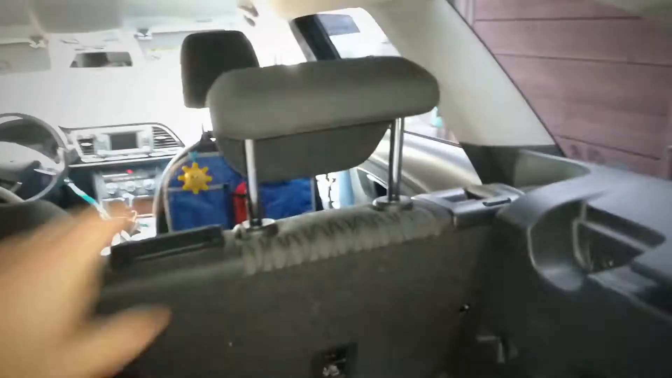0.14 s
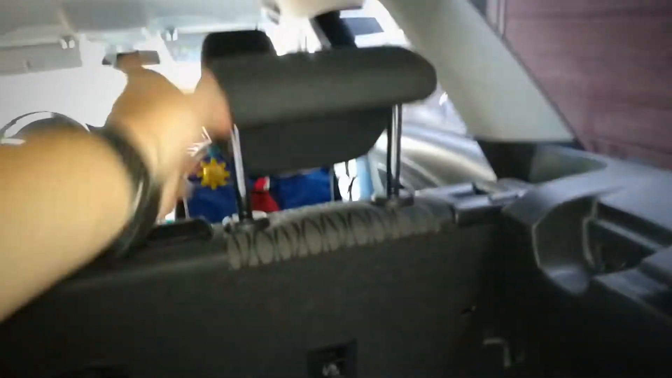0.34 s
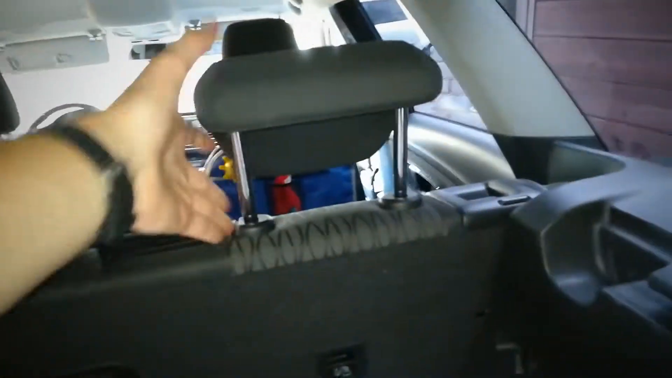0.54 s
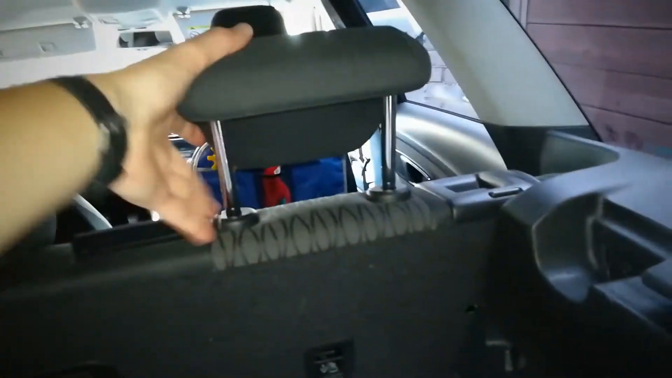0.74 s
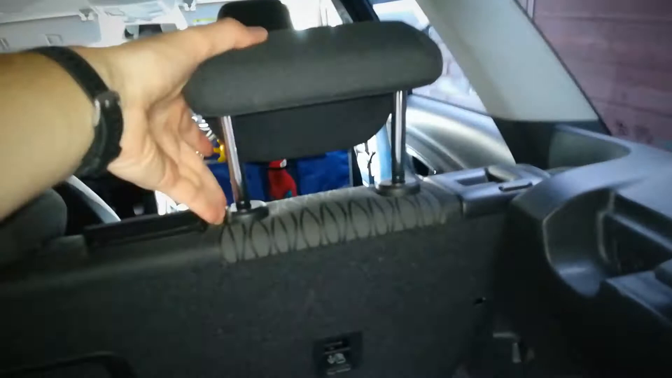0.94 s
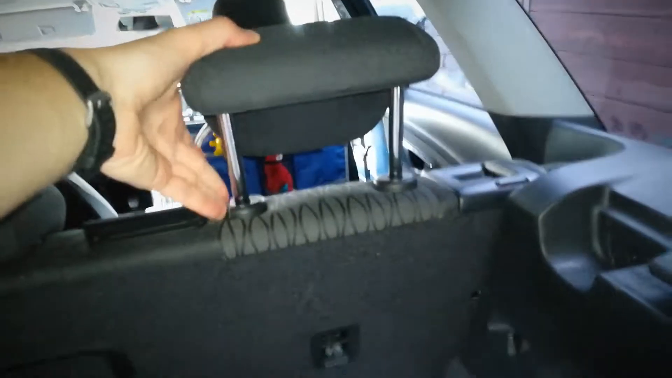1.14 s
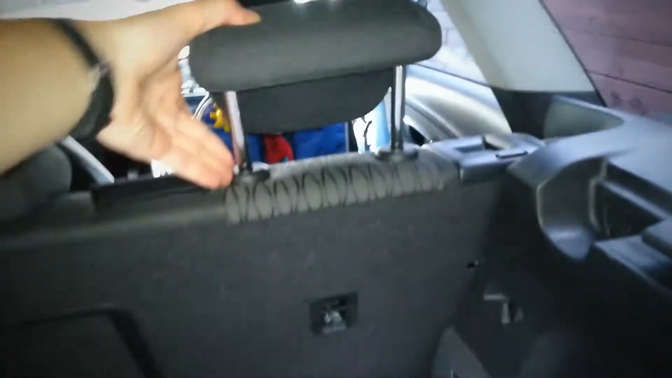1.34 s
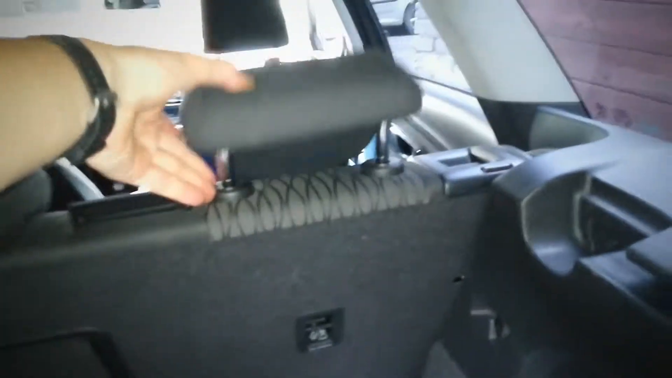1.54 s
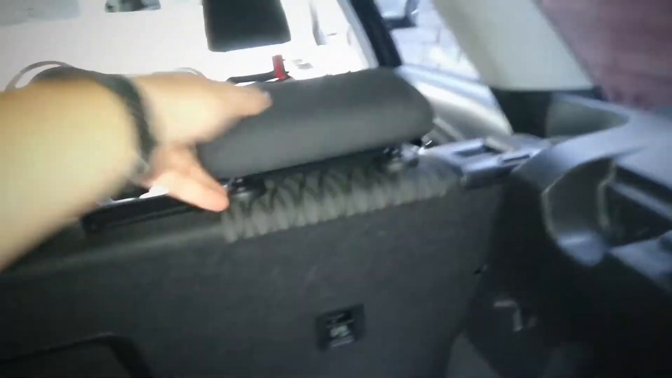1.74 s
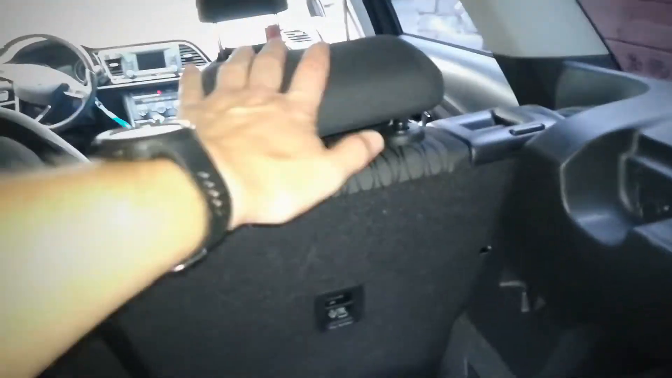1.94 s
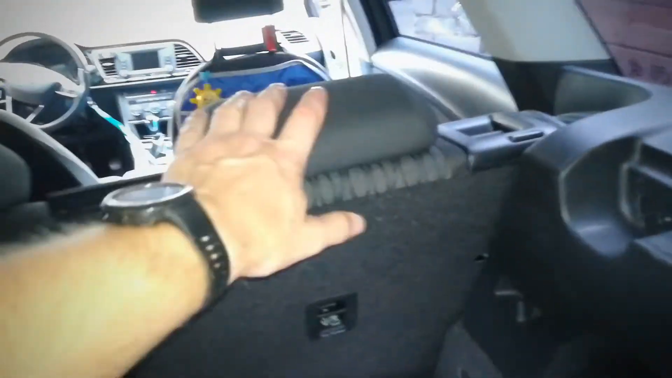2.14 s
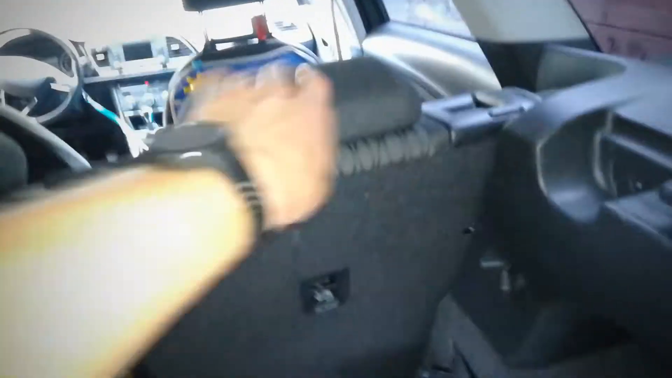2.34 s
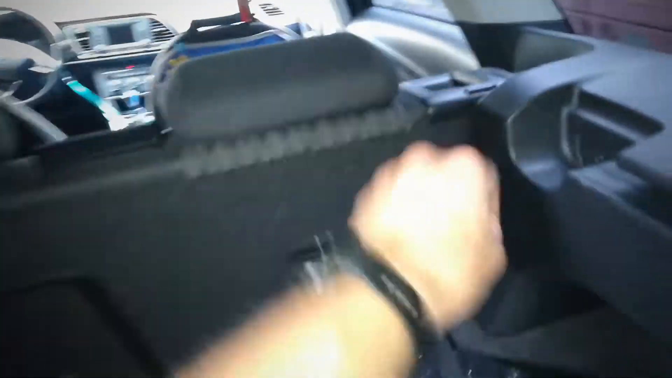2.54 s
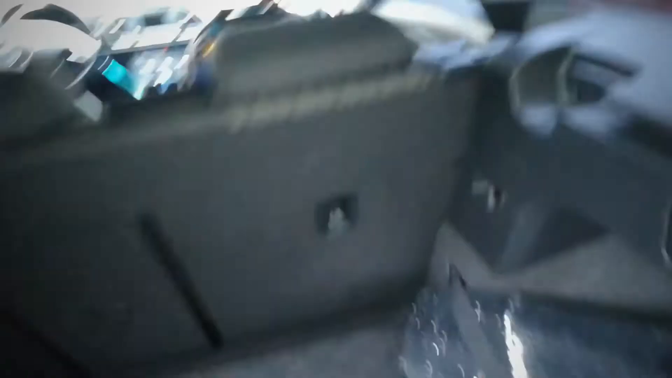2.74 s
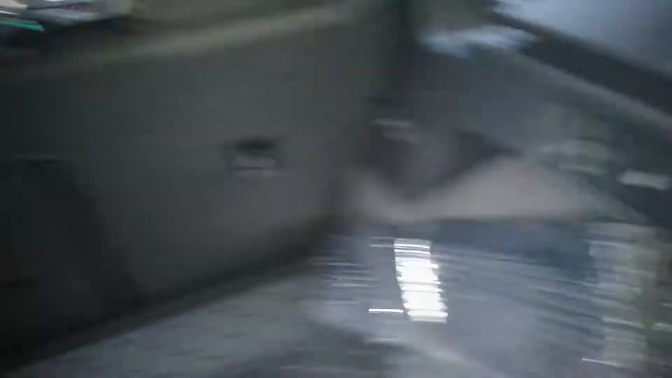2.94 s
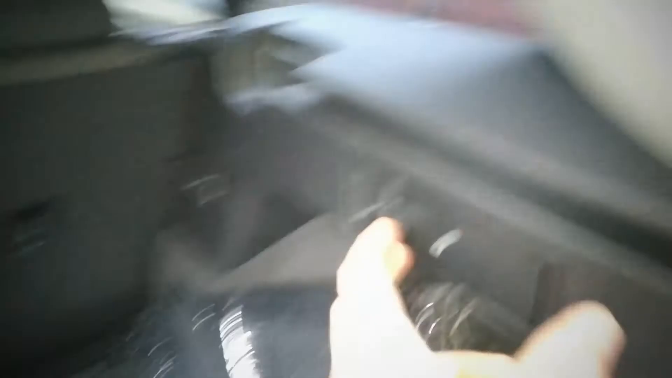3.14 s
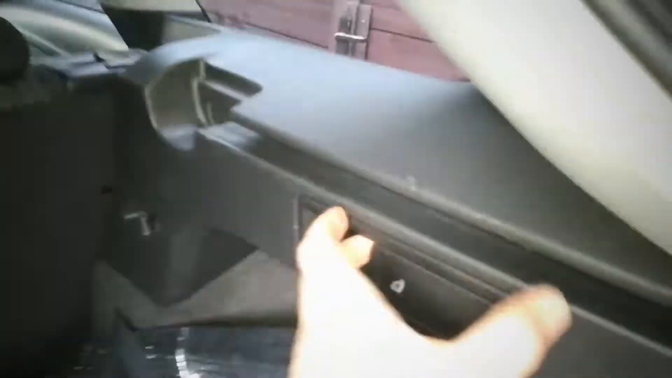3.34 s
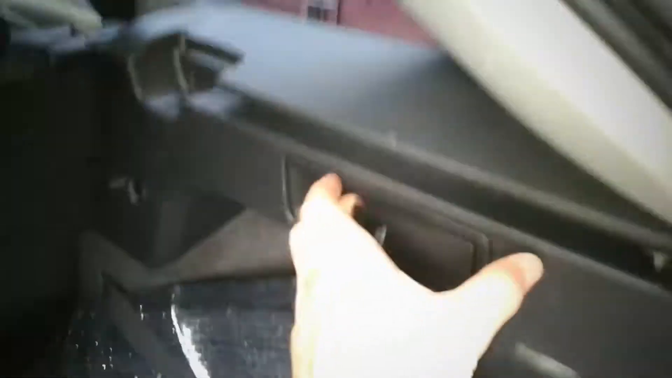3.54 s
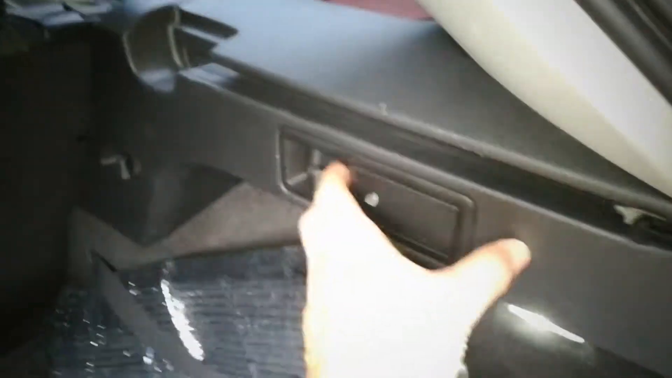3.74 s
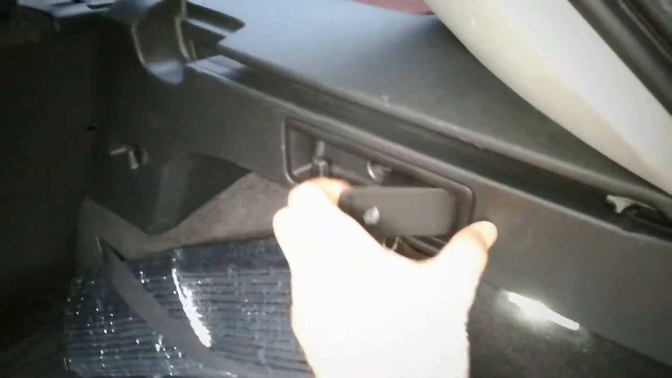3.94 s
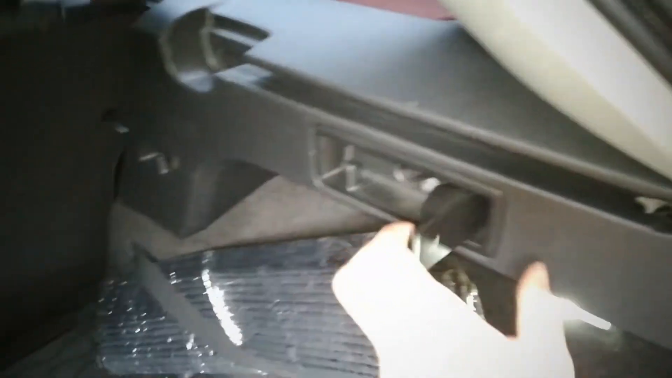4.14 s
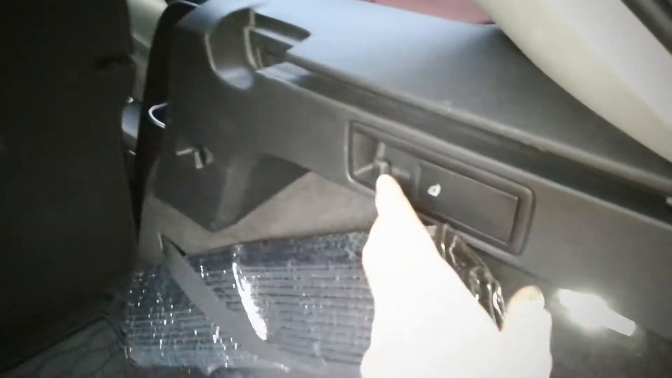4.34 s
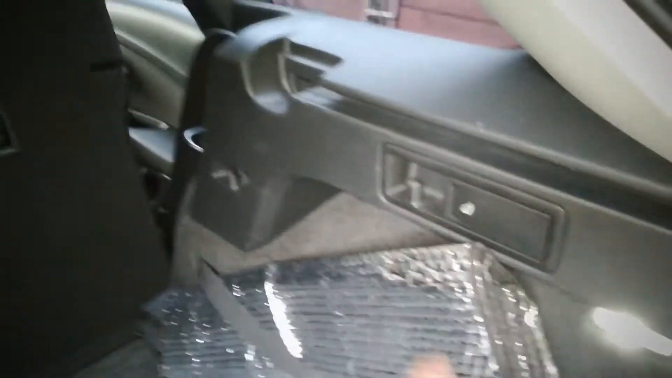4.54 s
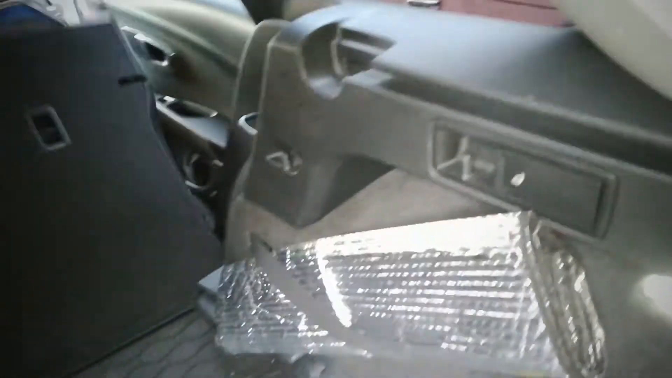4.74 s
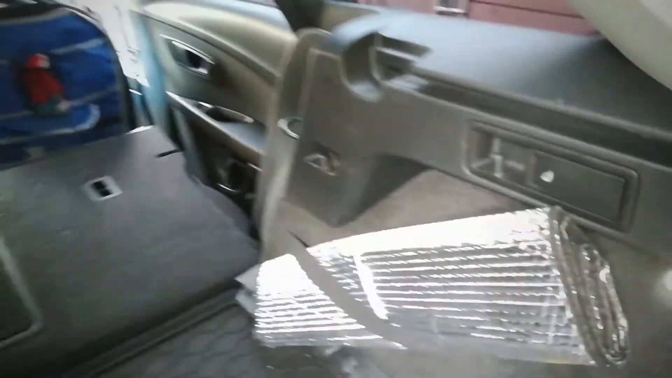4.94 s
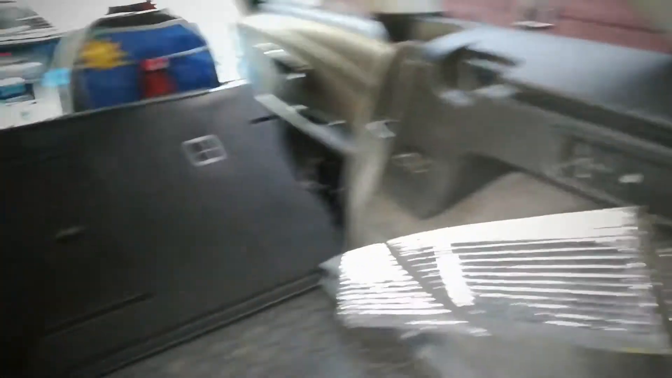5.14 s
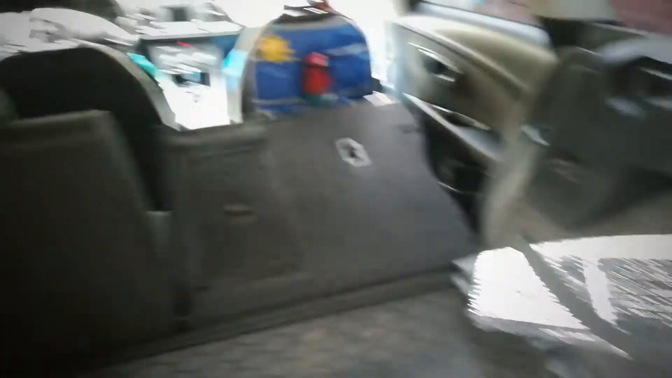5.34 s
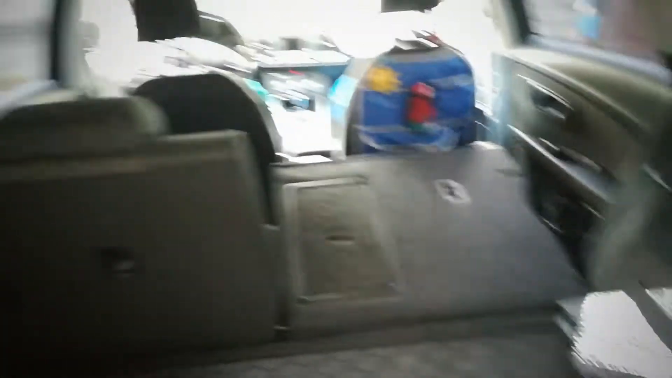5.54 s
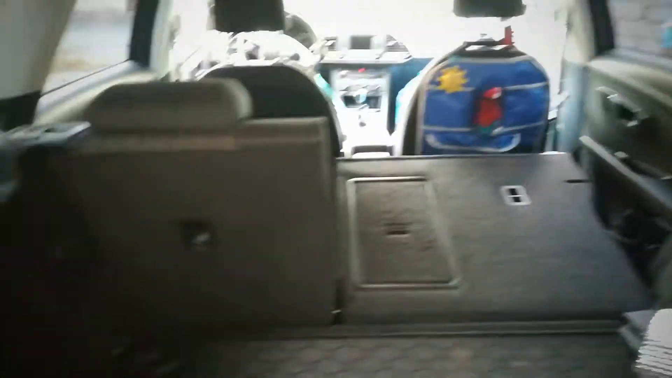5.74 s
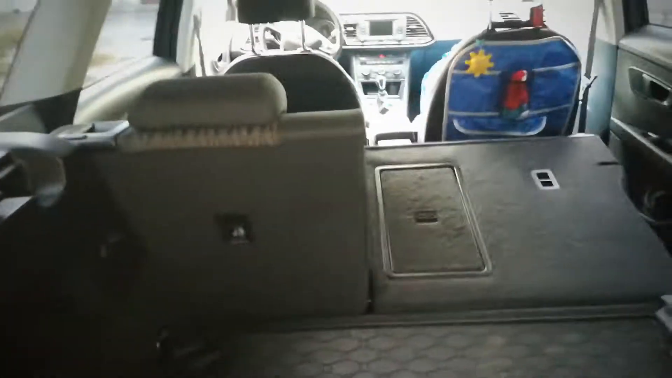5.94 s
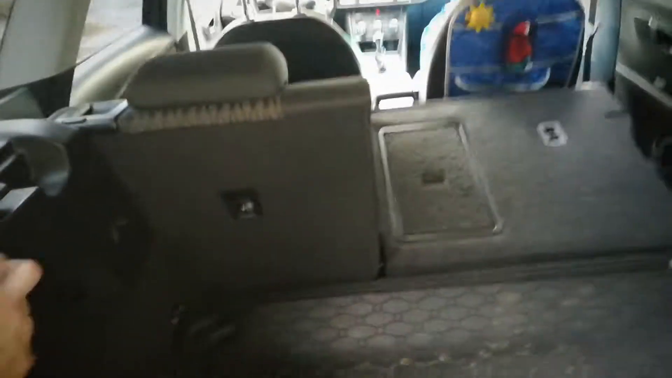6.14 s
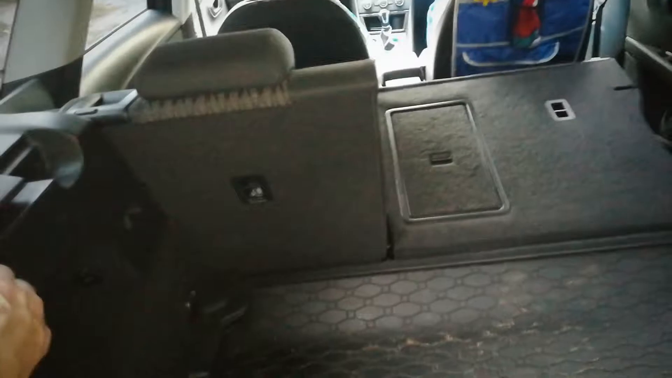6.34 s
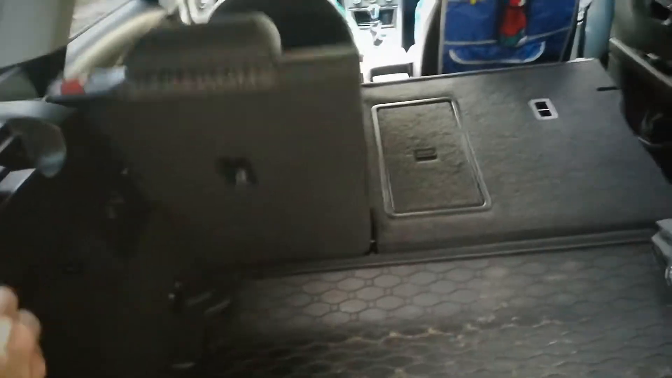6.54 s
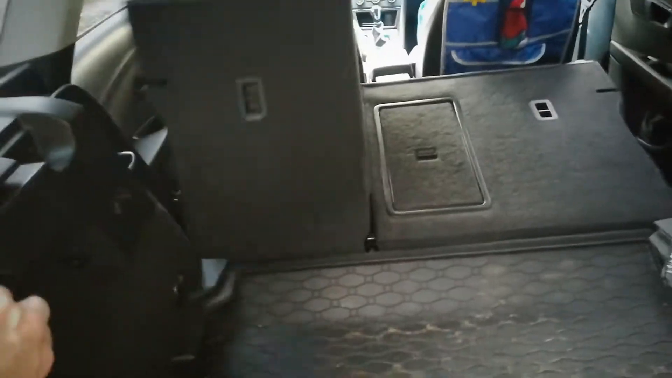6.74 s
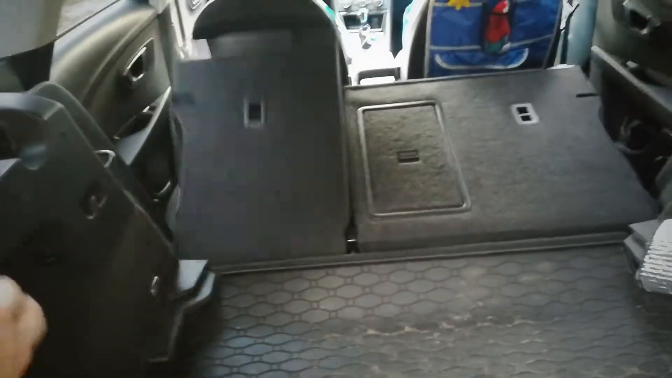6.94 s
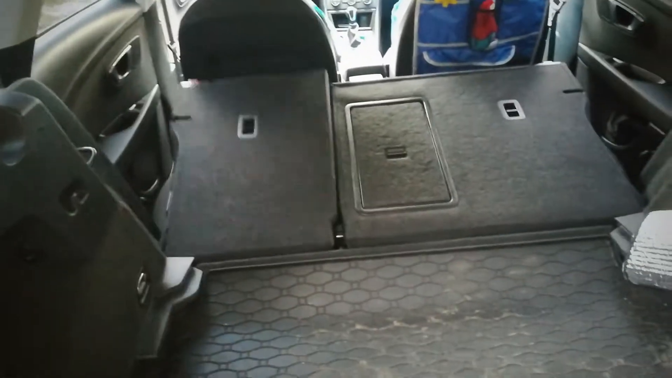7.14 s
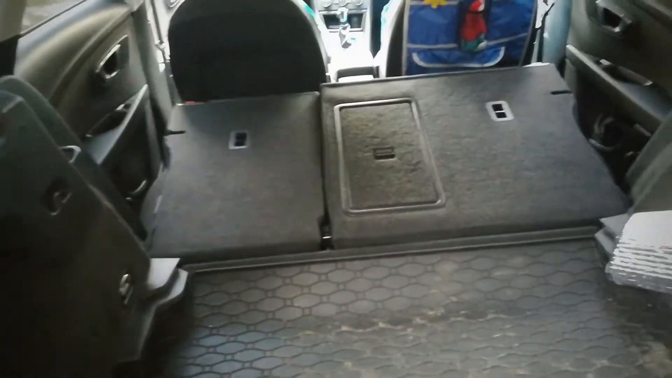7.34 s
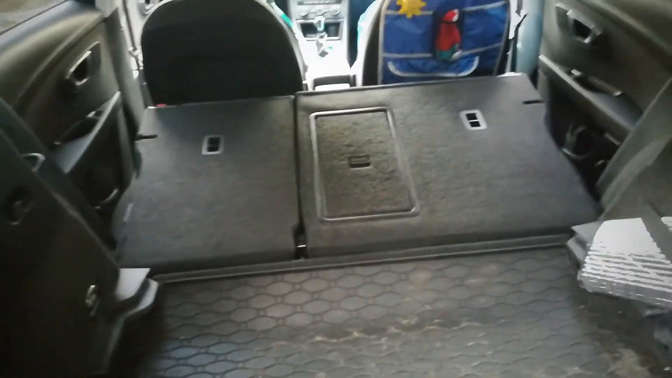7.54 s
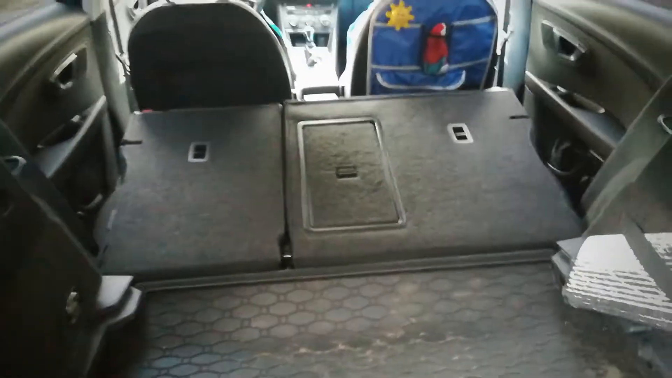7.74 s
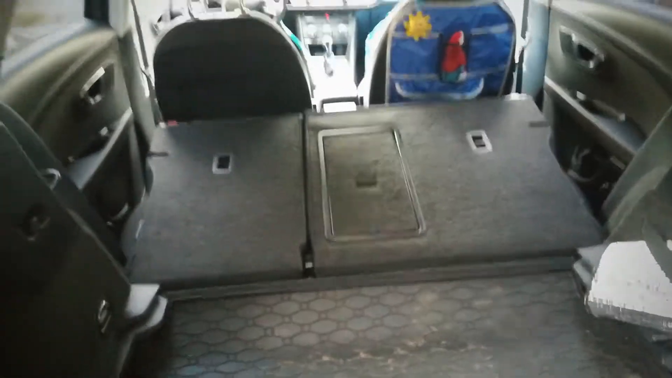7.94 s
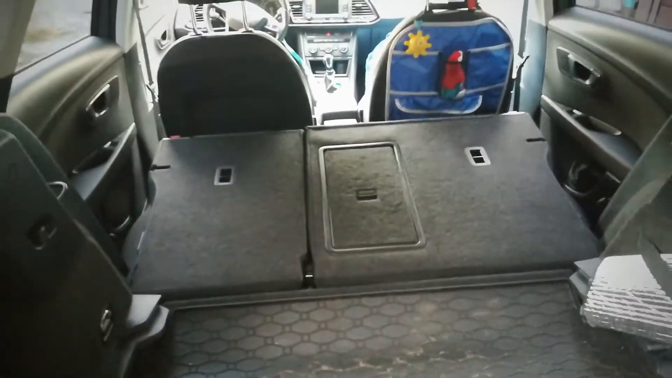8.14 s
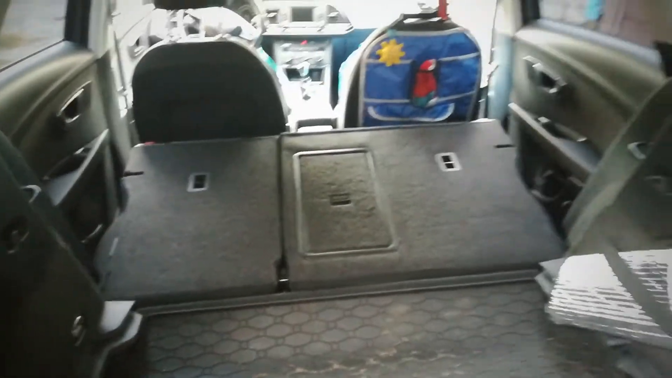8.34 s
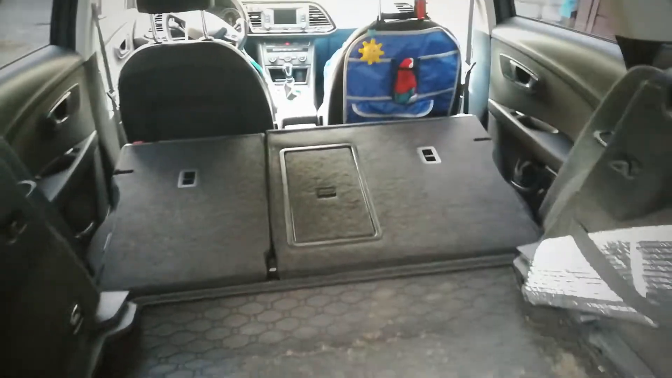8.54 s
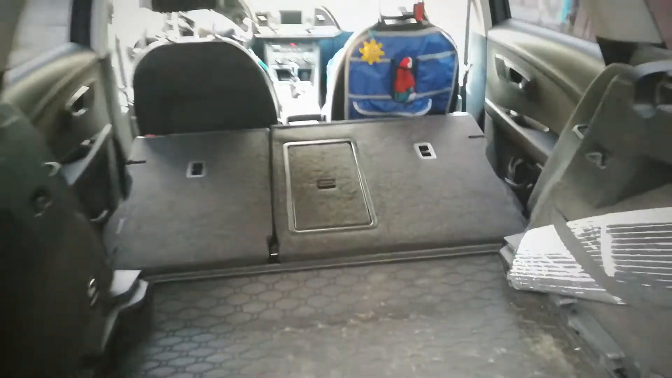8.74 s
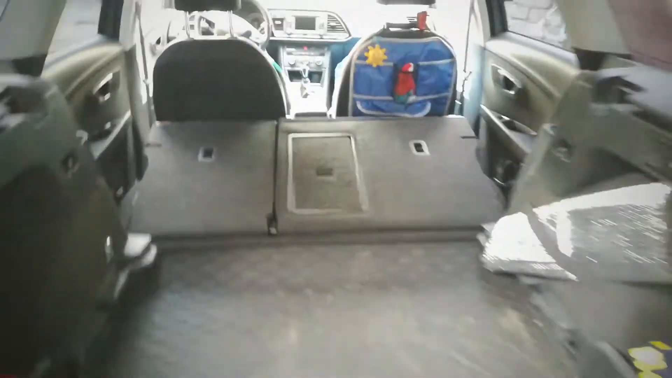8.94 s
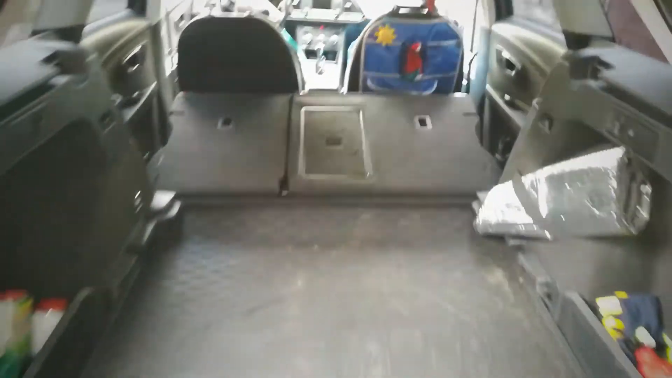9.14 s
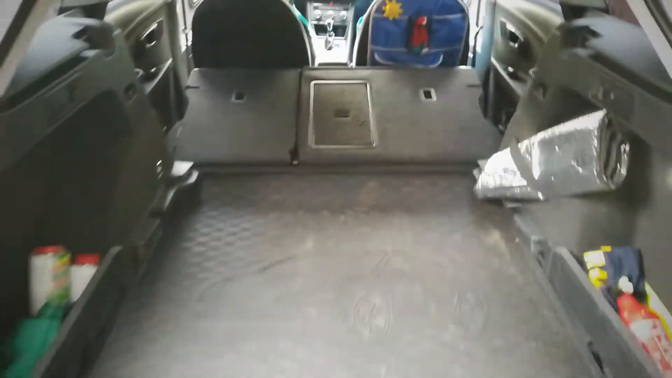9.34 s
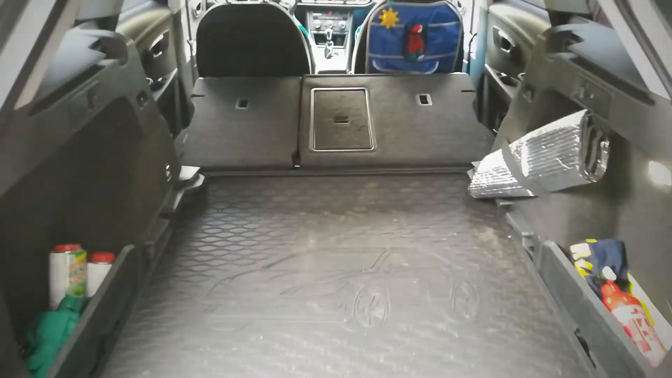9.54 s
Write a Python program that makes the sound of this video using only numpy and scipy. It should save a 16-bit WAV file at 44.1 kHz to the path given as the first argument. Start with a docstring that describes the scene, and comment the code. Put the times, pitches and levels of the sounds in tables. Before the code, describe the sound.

A headrest slides down with soft thuds, then a lever clacks sharply and two car seatbacks drop with deep, padded booms.

```python
"""Folding rear seats in a parked hatchback

Heard at a hand-held phone in the boot: a headrest is pushed down, then two levers release the rear seatbacks.
Catches: noise bursts ringing the trim. Belts, upholstery: grainy friction noise. Seatbacks drop and bounce:
pressure pulses booming in the cabin modes, with rumble of the swaying shell. Fingers tap and brush the phone.
Behind it, quiet outdoor noise and two engine hums."""
import sys
import numpy as np
from scipy import signal
from scipy.fft import rfft, irfft, next_fast_len
from scipy.io import wavfile

SR = 44100
rng = np.random.default_rng(int(sys.argv[2]) if len(sys.argv) > 2 else 0)


def waveform_to_disk(signal):
    """Save audio, clipped to [-1, 1], as 16-bit WAV at the path in sys.argv[1]."""
    frames = np.transpose(np.atleast_2d(signal))
    scaled = np.clip(frames, -1, 1) * 32767
    samples = np.round(scaled).astype(np.int16)
    wavfile.write(sys.argv[1], SR, samples)


N = 422478
TIME_S = np.arange(N) / SR
STEPS_S = np.arange(0, N / SR, .002)  # grid of the slow controls

# bands used throughout: low/Hz, high/Hz; order: main, body, bright, air
BAND_EDGES_HZ = [(600, 2500), (150, 600), (2500, 6000), (6000, 15000)]
# outdoor noise spectrum, relative: f/Hz, density/dB per Hz
OUTDOOR_COLOUR = [(13, -31), (22, 5.5), (54, -5), (157, -9), (218, -18), (279, -20), (582, -30.5),
                  (1060, -26.5), (1600, -26), (2540, -31.5), (3250, -29), (8010, -36), (15000, -40)]
# distant engines: mean f/Hz, loudest t/s, level/dB, half width/s
ENGINES = [(58.3, 0.33, -65.5, .3), (152, 3.17, -60, .24)]
# fingers on the phone's case: t/s, peak/dB, half contact/ms, left minus right/dB
TAPS = [(3.0015, -28.5, 0.23, 11.5), (3.1252, -40.5, 0.27, 16), (8.1915, -32, 1.3, 3.5),
        (8.1908, -33, 0.052, 20.5), (8.2424, -25.5, 0.19, 19), (8.4345, -34, .032, 2)]
# long slides of headrest, hand, belts, upholstery:
# start/s, end/s, starting level/dB, change/dB per s, body/dB, treble/dB (both re main band)
SLIDES = [(0.303, 0.508, -67, 1, -3.5, -5), (0.69, 0.91, -75, -1, 2, -3), (1.55, 1.853, -82, 22, -6, -6),
          (1.948, 2.38, -77.5, -2, 2.5, -2), (2.88, 3.223, -74.5, -4, -1.5, -5.5),
          (3.284, 3.517, -62, -23, 4, -8.5), (3.68, 3.88, -80, 33, 2.5, 0),
          (3.87, 4.12, -61.5, 12, -2, -8.5), (4.13, 4.35, -48.5, -3, -5, -3.5),
          (4.42, 4.937, -55, -32, 1.5, -7.5), (5.105, 5.734, -72.5, 1.5, 2, -6.5),
          (5.73, 5.906, -65.5, -10, -7, -6.5), (5.93, 6.348, -76, 1.5, 2.5, -2.5),
          (6.353, 6.6, -62, -10, 2.5, -10.5), (6.627, 6.865, -56.5, -22, 0.5, -9),
          (6.979, 7.101, -51.5, -45, 7, -12), (7.37, 7.623, -73, -16, 4.5, -5),
          (8.762, 9.552, -80, -0.5, 3.5, -4.5)]
# short rubs and creaks of cloth, skin, hinges: start/s, end/s, level before swell/dB,
# body/dB, bright/dB, air/dB (all three re level), left minus right/dB, resonance f/Hz
RUBS = [(0.346, 0.425, -65.5, -5, 1, -15, -1, 1720), (0.428, 0.475, -63.5, 8, 3, 0, -2, 4170),
        (2.062, 2.165, -58, 2.5, -9, -12.5, -2.5, 960), (2.394, 2.483, -70.5, -25, 11, 11, -2.5, 4230),
        (2.403, 2.438, -61, -20, -20, -24, -7, 1480), (3.124, 3.205, -64, -3, -20, -25, 12, 1070),
        (3.256, 3.265, -56, -8, -14, -17, -6, 1800), (3.319, 3.349, -55, -6, -6.5, -20, -3, 4370),
        (3.365, 3.405, -59, -15, -30, -20, -4, 1740), (5.326, 5.395, -55.5, -25, -15.5, -23, -1.5, 1470),
        (6.113, 6.18, -60.5, -17, -8, -16, 3, 1900), (6.111, 6.164, -73, -8, 13.5, -8, 2, 3600),
        (6.867, 6.968, -48.5, -6, -26, -17.5, -2.5, 1180), (6.872, 6.958, -64.5, -13, 13.5, -18, 3, 3700),
        (6.982, 7.098, -55, -2.5, -0.5, 2, -5, 1620), (7.145, 7.241, -60, -4, -7, -7, -4.5, 1170),
        (7.262, 7.376, -63, -1.5, -7.5, -7.5, -2, 1177), (8.181, 8.212, -57, 5, -5.5, -12, 12, 6070),
        (8.244, 8.268, -51.5, -6, 0.5, -7.5, 15, 1640), (8.777, 8.834, -67.5, -20.5, -1.5, -19, 3, 2060),
        (8.844, 8.939, -71.5, -20, -1.5, -19.5, -1, 1570), (8.95, 8.98, -64, -18, -8.5, -26, -1, 2170),
        (9.049, 9.09, -67.5, -11.5, -8, -20, -1.5, 865)]
# catches, levers, trim: t/s, main-band level/dB, body/dB, bright/dB, air/dB (all three re level),
# ring t60/s, left minus right/dB, the part's own note f/Hz
KNOCKS = [(0.326, -61.5, -23, 7, -4.5, 0.048, -2, 1780), (0.439, -63.5, 5, 5, -3, 0.044, -5, 4280),
          (0.467, -54.5, 2.5, -1.5, -5.5, 0.046, -3, 4150),
          (0.8299, -48.5, 6, -4.5, -15.5, 0.044, -2.5, 1180),
          (1.2396, -46.5, -1.5, -28, -15, 0.037, -3.5, 1550),
          (1.252, -49.5, -25, 0.5, 0.5, 0.01, -1.5, 1150),
          (1.3449, -62.5, -2.5, -6.5, 0.5, 0.021, -1.5, 870),
          (1.861, -64, 1.5, -2.5, 0.5, 0.087, -0.5, 1550), (1.951, -47.5, -7.5, -50, -36, 0.014, -4, 850),
          (2.1944, -66.5, -13, -1, -13, 0.039, -1, 1330), (2.23, -60, -8, -0.5, -17, 0.024, -2, 1160),
          (2.313, -79.5, -1, 11.5, 3, 0.17, -1, 4540), (3.2801, -47, -7, -4.5, -16.5, 0.035, -3, 1930),
          (3.4923, -52, -2.5, -18.5, -23, 0.07, -4.5, 1820), (3.613, -43, -0.5, -9.5, -14, 0.037, -4, 1610),
          (3.895, -56, -22, -14, -13, 0.036, 1, 1500), (3.928, -50.5, -21, -13, -27, .038, 2.5, 2130),
          (4.032, -42.5, -13, -2.5, -14.5, 0.071, -9.5, 1880), (4.046, -52.5, -17, 6, -3, 0.061, 3, 2880),
          (4.0828, -32, -6, -28, -26, .07, -1, 1070), (4.096, -46.5, -12, -4, -6.5, .07, -1.5, 950),
          (4.3348, -48.5, -9.5, -6, 3, 0.02, -7, 4920), (4.353, -52, -8, 5, 13, 0.045, 9, 1360),
          (4.3564, -26.5, -4, -3, -5.5, 0.038, -2.5, 1490),
          (4.3858, -38, 4.5, -3, -12.5, 0.058, -2.5, 1015), (4.946, -55, 11, -11.5, -12, 0.45, -2, 646),
          (4.9662, -58.5, 5.5, 4.5, -3, .038, 1, 650), (5.004, -59.5, 7.5, 0, 4, 0.089, -3, 648),
          (5.129, -47.5, -14.5, -2.5, -10.5, 0.071, 0, 1630), (6.222, -56.5, -7, -7, -29, 0.08, -1, 1910),
          (6.333, -74, -2, 3, 2, 0.11, 0, 5170), (6.356, -52.5, -4.5, -8, -12, 0.091, -2, 1904),
          (6.5125, -47, -14, -3, -5, 0.12, -3.5, 1330), (6.57, -40, -5.5, -18, -29, 0.047, 1, 1260),
          (6.586, -45, -12, 1.5, -14.5, 0.07, -5, 3100), (6.6074, -42.5, -15, 3, -16, 0.02, -4, 3850),
          (6.613, -34.5, -23, -9, -18, 0.04, -1.5, 1490), (6.633, -49, -4, 8.5, 0, .03, -7, 3800),
          (6.6375, -48.5, -6, 7, -1.5, .06, -1, 3000), (6.9455, -29, -7, -4, -7, .057, 0.5, 1677),
          (6.978, -44.5, 7, 6, -4.5, 0.093, -1, 3160), (7.081, -47, 7, -19, -32, 0.11, -3.5, 1110)]
# weight leaning on the seats: middle t/s, level before the rumble's gain/dB, half width/s
LEANS = [(0.38, -52, 0.054), (0.81, -53.5, 0.053), (2.05, -52, 0.07), (2.27, -56, 0.029), (3.35, -60, 0.25),
         (4.14, -38.5, 0.08), (4.6, -54, 0.21), (5.53, -40.5, 0.075), (6.25, -62.5, 0.38), (8.3, -67, .25)]
# padded blows of headrest, hand, seatbacks: t/s, peak before the layer's gain/dB, half contact/ms
THUMPS = [(0.498, -44, 3.9), (1.257, -40.5, 3.4), (1.288, -37.5, 3.6), (1.963, -47, 2.1),
          (2.147, -36.5, 4.5), (3.381, -45, 3.5), (3.445, -44.5, 4.2), (4.154, -33, 3.6), (4.961, -18, 3.2),
          (5.018, -34, 2.45), (5.043, -26, 3.3), (5.193, -39.5, 3.05), (5.279, -38, 3.4),
          (5.421, -34.5, 4.2), (5.525, -39, 3), (5.621, -44.5, 3.74), (5.96, -49, 2.4), (6.563, -38.5, 1.6),
          (6.575, -27.5, 2.62), (6.66, -33, 3.25), (6.961, -27.5, 1.6), (7.095, -19, 3.17),
          (7.165, -32.5, 3.26), (7.376, -33, 3.62), (7.409, -37.5, 4.17), (9.19, -39, 3.6),
          (9.306, -47, 3.1)]
# modes of plastic trim and catch: f/Hz, t60/s, relative level/dB
TRIM_MODES = [(178, .14, 1), (354, .14, 3), (425, .14, 1), (500, .08, -1), (665, .12, -2), (960, .07, -2),
              (1110, .05, -2), (1385, .07, 4), (1760, .035, 1), (2180, .04, 0), (2350, .04, 0),
              (3370, .06, 1), (3700, .04, 0), (4300, .03, -1), (4800, .035, 0), (7700, .03, 5),
              (8450, .035, 2)]
# modes of cabin air and body panels: f/Hz, t60/s, relative level/dB
CABIN_MODES = [(34.3, 0.24, 3.5), (42.4, 0.77, 1.5), (59, 1, 0.5), (77.7, 0.98, 0), (106, 0.38, -3),
               (142.7, 0.12, 7.5), (189, 0.44, -0.5)]
# spectrum of hard contacts: f/Hz, level/dB
HARD_COLOUR = [(100, 18), (250, 9), (550, -13), (800, 4), (1400, 4), (2000, 2.5), (2700, -2.5), (4000, 0.5),
               (6000, -9), (8200, -9.5), (10500, -17.5), (15000, -30)]
# spectrum of friction: f/Hz, level/dB
SOFT_COLOUR = [(100, 22.5), (300, 9), (600, 0), (1300, 9.5), (2600, -1.5), (4500, -5), (8500, -8.5),
               (11000, -11.5), (15000, -18.5)]
# stereo width: f/Hz, side re mid/dB
WIDTH = [(30, -24), (70, -19), (150, -15), (300, -5.5), (600, 2.5), (2000, -2.5), (10000, 1.5)]
# port shading of sounds from the trim: f/Hz, left minus right/dB
PORTS = [(300, 1.5), (600, 5), (1100, -3), (2000, 0.5), (4000, 7.5), (8000, -3.5)]


def undb(db):
    """Decibels to gain."""
    return 10 ** (np.asarray(db) / 20)


def rms(x):
    """Root mean square, never zero."""
    return np.sqrt(np.mean(x ** 2)) + 1e-12


def pan(db):
    """Left and right gains of constant power."""
    gains = undb(np.array([[db], [-db]]) / 2)
    return gains / rms(gains)


def add(out, start_s, x):
    """Mix x into out from start_s."""
    i = int(start_s * SR)
    out[:, i:i + x.shape[1]] += x[:, :N - i]


def colour(x, points):
    """Filter by (f/Hz, level/dB) points, interpolated over log frequency."""
    hz, db = np.transpose(points)
    f = np.fft.rfftfreq(x.shape[-1], 1 / SR)
    gain = undb(np.interp(np.log(f + 1), np.log(hz), db))
    return irfft(rfft(x) * gain, x.shape[-1])


def noise(size):
    """Stereo noise, nearly mono in the bass."""
    mid, side = rng.standard_normal((2, next_fast_len(size)))
    side = colour(side, WIDTH)
    return np.array([mid + side, mid - side])[:, :size]


def band(x, edges_hz):
    """Band-pass between two edges."""
    return signal.sosfilt(signal.butter(4, edges_hz, "band", fs=SR, output="sos"), x)


def ring(x, modes):
    """Sum of two-pole resonators; each level is about the gain at its centre."""
    out = 0
    for hz, t60_s, db in modes:
        r = np.exp(-np.log(1000) / (t60_s * SR))
        poles = [1, -2 * r * np.cos(2 * np.pi * hz / SR), r * r]
        out = out + undb(db) * (1 - r) * signal.lfilter([1, 0, -1], poles, x)
    return out


def fade(t_s, t60_s):
    """Decay by 60 dB in t60_s."""
    return np.exp(-np.log(1000) * t_s / t60_s)


def swell(middle_s, half_s):
    """Slow bell-shaped rise and fall."""
    return np.exp(-np.minimum(((STEPS_S - middle_s) / half_s) ** 2, 100) / 2)


def smooth(gain):
    """Interpolate a slow control to one value per sample."""
    return np.interp(TIME_S, STEPS_S, gain)


def wander(size, rate_hz):
    """Straight lines between random normal values, rate_hz of them a second."""
    knots = rng.standard_normal(int(size / SR * rate_hz) + 2)
    return np.interp(np.arange(size) / SR * rate_hz, np.arange(len(knots)), knots)


def push(t_s, half_ms):
    """Pressure of a cushioned contact: a dip between two smaller swells."""
    u = (t_s * 1000 / half_ms) ** 2
    return (u - 1) * np.exp(-u / 2)


def friction(size, grain_db, waver_db, modes, snag_db):
    """Fibres catch and slip: uneven grainy noise with sparse snags rings modes; four bands of unit rms."""
    snags = (rng.random(size) < 70 / SR) * rng.exponential(1, size)  # about 70 per s
    snags = signal.lfilter([1], [1, -np.exp(-1 / (0.0025 * SR))], snags)  # 2.5 ms decay
    grip = undb(grain_db * wander(size, 900) + waver_db * wander(size, 49))
    grip = grip * (1 + undb(snag_db) * snags)
    grains = colour(noise(next_fast_len(size)), SOFT_COLOUR)[:, :size] * grip
    grains = grains + ring(grains, modes)
    bands = [band(grains, edges_hz) for edges_hz in BAND_EDGES_HZ]
    return [b / rms(b) for b in bands]


def reflections(x, t60_s, wet_db, delay_s, dull_hz):
    """Diffuse noise tail, building up over delay_s, low-passed at dull_hz."""
    t_s = np.arange(SR) / SR
    tail = noise(SR) * fade(t_s, t60_s) * (1 - np.exp(-(t_s / delay_s) ** 2))
    tail = tail / np.sqrt(np.sum(tail ** 2) / 2)  # unit energy per channel, on average
    tail = signal.sosfilt(signal.butter(1, dull_hz, fs=SR, output="sos"), tail)
    return undb(wet_db) * signal.fftconvolve(x, tail, axes=1)[:, :N]


def ports(x):
    """The phone's body shades its left and right ports differently."""
    size = next_fast_len(N)
    shaded = []
    for channel, sign in zip(x, (1, -1)):
        points = [(hz, sign * db / 2) for hz, db in PORTS]
        shaded.append(colour(np.pad(channel, (0, size - N)), points)[:N])
    return np.array(shaded)


def background(air_db=-67, air_waver_db=1.0, hum_waver_db=1.5):
    """Quiet outdoor rumble and hiss, plus far engines: sines wavering in pitch and level."""
    air = colour(noise(next_fast_len(N)), OUTDOOR_COLOUR)[:, :N]
    out = air / rms(air) * undb(air_db + air_waver_db * wander(N, 2.7))
    for hz, loudest_s, db, half_s in ENGINES:
        phase = 2 * np.pi * np.cumsum(hz * (1 + 0.0079 * wander(N, 8.14))) / SR
        level = smooth(swell(loudest_s, half_s)) * undb(db + hum_waver_db * wander(N, 11))
        out = out + np.sqrt(2) * np.sin(phase) * level
    return out


def taps(tick_db=-15, tick_t60_s=0.021, lag_s=0.0005):
    """Dry pressure blips through the case, later at the right port, with a short noise tick."""
    out, lead_s = np.zeros((2, N)), .01
    t_s = np.arange(2048) / SR - lead_s
    for hit_s, db, half_ms, pan_db in TAPS:
        blip = np.array([push(t_s, half_ms), push(t_s - lag_s, half_ms)])
        tick = colour(noise(len(t_s)), SOFT_COLOUR) * (t_s > 0) * fade(np.abs(t_s), tick_t60_s)
        add(out, hit_s - lead_s, undb(db) * pan(pan_db) * (blip + undb(tick_db) * tick))
    return out


def slides(trim_db=-5, attack_s=0.03, release_s=0.024, air_fall=1.3):
    """Long friction as headrest and seatbacks slip past belts and trim; each sets in, runs on, dies away."""
    modes = [(hz, t60_s, db + trim_db) for hz, t60_s, db in TRIM_MODES]
    bands = friction(N, grain_db=1, waver_db=2, modes=modes, snag_db=-8)
    power = 0
    for start_s, end_s, db, db_per_s, body_db, treble_db in SLIDES:
        attack = np.clip((STEPS_S - start_s) / attack_s + .5, 0, 1)
        release = np.exp(-np.clip((STEPS_S - end_s) / release_s, 0, 20))
        drift_db = db_per_s * np.clip(STEPS_S - start_s, 0, end_s - start_s)
        speed = attack * release * undb(db + drift_db)
        # the air band follows the treble, exaggerated
        band_gains = undb([0, body_db, treble_db, air_fall * treble_db])
        power = power + np.outer(band_gains, speed) ** 2
    return sum(b * smooth(np.sqrt(p)) for b, p in zip(bands, power))


def rubs(swell_power=0.78, cycles=11, resonance_db=11, margin_s=0.0071):
    """Brief friction strokes that swell and ease off, each through one broad resonance."""
    out = np.zeros((2, N))
    for start_s, end_s, db, body_db, bright_db, air_db, pan_db, hz in RUBS:
        size = int((end_s - start_s + 2 * margin_s) * SR)
        speed = np.abs(np.sin(np.pi * np.linspace(0, 1, size))) ** swell_power
        modes = [(hz, cycles / hz, resonance_db)]
        bands = friction(size, grain_db=3, waver_db=1.5, modes=modes, snag_db=-8)
        stroke = sum(undb(rel_db) * b for rel_db, b in zip((0, body_db, bright_db, air_db), bands))
        add(out, start_s - margin_s, stroke * speed * undb(db) * pan(pan_db))
    return out


def knocks(crack_db=4, crack_s=0.0012, lag_s=.00025, body_t60_s=.1, trim_db=-1,
           own_db=8, own_cycles=12, onset_db=-13, onset_s=0.0036):
    """Parts strike with a softened onset: crack and chatter ring part and trim; the body has its own decay."""
    out, lead_s = np.zeros((2, N)), .01
    t_s = np.arange(12000) / SR - lead_s
    level_window = t_s < .02
    onset = undb(onset_db) * np.exp(-np.abs(t_s) / onset_s)
    for hit_s, db, body_db, bright_db, air_db, t60_s, pan_db, hz in KNOCKS:
        chatter = colour(noise(len(t_s)), HARD_COLOUR)
        # direct crack, left port first; the chatter is diffuse
        crack = colour(noise(len(t_s))[0], HARD_COLOUR) * (t_s >= 0) * np.exp(-np.abs(t_s) / crack_s)
        crack = np.array([crack, np.interp(t_s - lag_s, t_s, crack)])
        sharp = chatter * np.where(t_s < 0, onset, fade(t_s, t60_s)) + undb(crack_db) * crack
        sharp = sharp + ring(sharp, [(hz, own_cycles / hz, own_db)])
        heavy = chatter * np.where(t_s < 0, onset, fade(t_s, body_t60_s))
        sharp = sharp + undb(trim_db) * ring(sharp, TRIM_MODES)
        heavy = heavy + undb(trim_db) * ring(heavy, TRIM_MODES)
        rel_dbs = (0, body_db, bright_db, air_db)
        for x, edges_hz, rel_db in zip((sharp, heavy, sharp, sharp), BAND_EDGES_HZ, rel_dbs):
            part = band(x, edges_hz)
            gain = undb(db + rel_db) / rms(part[:, level_window])
            add(out, hit_s - lead_s, part * gain * pan(pan_db))
    return out


def rocking(level_db=-1, sway_db=-25, sway_t60_s=1.6, rise_s=.04, reference_half_ms=2.7):
    """Deep rumble: the shell sways after each padded blow, more after a long push, and when leant on."""
    rumble = band(noise(N), (22, 105))
    power = sum((undb(db) * swell(middle_s, half_s)) ** 2 for middle_s, db, half_s in LEANS)
    for hit_s, db, half_ms in THUMPS:
        t_s = np.maximum(STEPS_S - hit_s, 0)
        sway = undb(db + sway_db) * fade(t_s, sway_t60_s)
        power = power + sway ** 2 * (1 - np.exp(-t_s / rise_s)) * half_ms / reference_half_ms
    return rumble / rms(rumble) * smooth(np.sqrt(power)) * undb(level_db)


def blows(panel_lag_s=.008, panel_db=5, panel_half_ms=1.0):
    """Padded blows plus the panel flexing behind each knock: t/s, peak/dB, half contact/ms."""
    panels = [(hit_s + panel_lag_s, db + body_db + panel_db, panel_half_ms)
              for hit_s, db, body_db, *_ in KNOCKS]
    return list(THUMPS) + panels


def thumps(cabin_db=3, shudder_db=-15, shudder_t60_s=0.12, shudder_span=6, level_db=-1.0):
    """A soft blow drives the cabin's air; seat frame and springs shudder on, higher if contact is shorter."""
    drive, shudder, lead_s = np.zeros((1, N)), np.zeros((2, N)), .02
    t_s = np.arange(8192) / SR - lead_s
    early = (t_s > 0) & (t_s < .1)  # level window of the shudder
    for hit_s, db, half_ms in blows():
        top_hz = np.clip(420 / half_ms, 90, 480)
        shake = noise(len(t_s)) * (t_s > 0) * fade(np.abs(t_s), shudder_t60_s)
        shake = band(shake, (top_hz / shudder_span, top_hz))
        add(shudder, hit_s - lead_s, undb(db + shudder_db) * shake / rms(shake[:, early]))
        add(drive, hit_s - lead_s, undb(db) * push(t_s, half_ms)[None])
    boom = undb(cabin_db) * ring(drive, CABIN_MODES)
    return undb(level_db) * (drive + boom + shudder)


def scene():
    """Knocks and rubs fill the padded cabin briefly; knocks echo faintly from the yard via the open hatch."""
    hard, strokes = ports(knocks()), rubs()
    cabin = reflections(hard + undb(-3) * strokes, t60_s=0.22, wet_db=-11.0, delay_s=0.0034, dull_hz=5000)
    yard = reflections(hard, t60_s=0.44, wet_db=-22.5, delay_s=.04, dull_hz=4000)
    contacts = hard + strokes + cabin + yard
    return background() + taps() + slides() + contacts + rocking() + thumps()


def record(dry, bottom_hz=18, top_hz=15700):
    """The phone drops the deepest bass and cuts the top steeply."""
    x = signal.sosfilt(signal.butter(2, bottom_hz, "high", fs=SR, output="sos"), dry)
    return signal.sosfilt(signal.ellip(8, .2, 70, top_hz, fs=SR, output="sos"), x)


dry = scene()
out = record(dry)
waveform_to_disk(out)
```